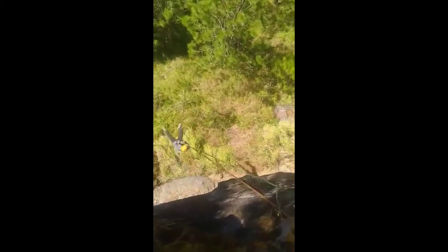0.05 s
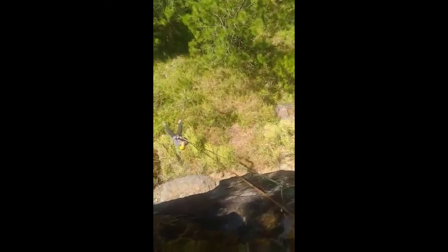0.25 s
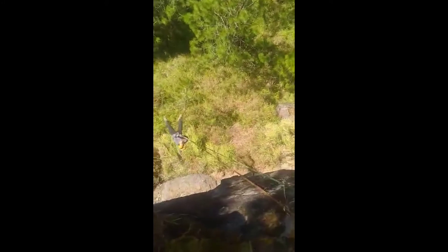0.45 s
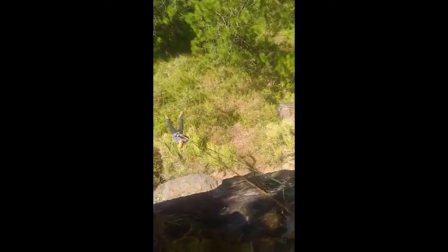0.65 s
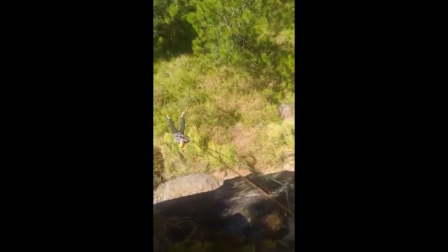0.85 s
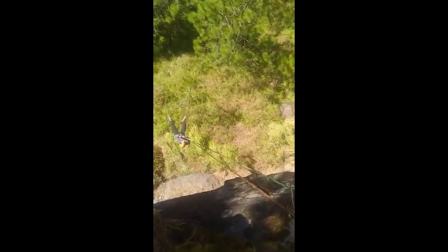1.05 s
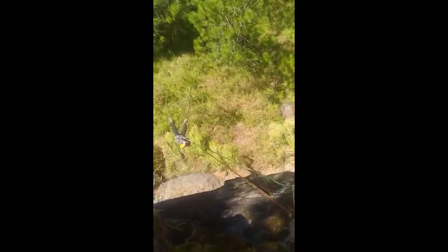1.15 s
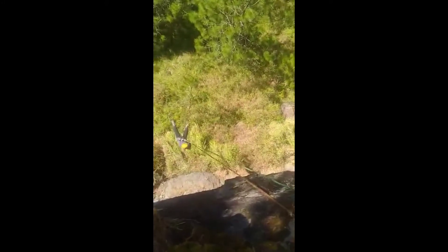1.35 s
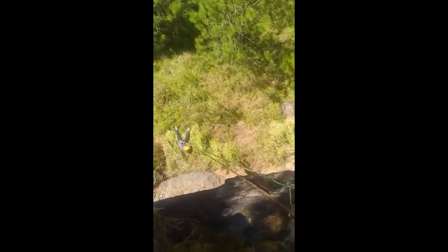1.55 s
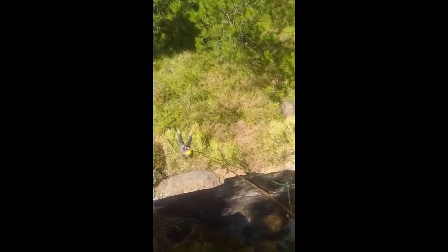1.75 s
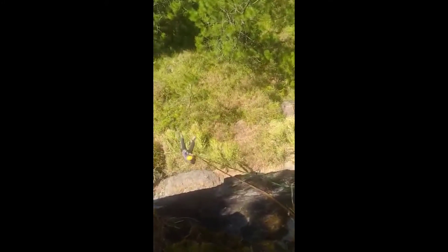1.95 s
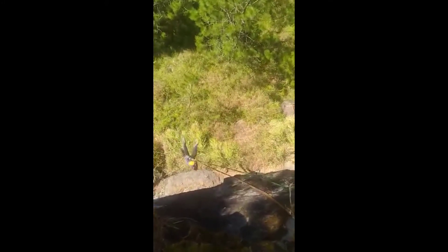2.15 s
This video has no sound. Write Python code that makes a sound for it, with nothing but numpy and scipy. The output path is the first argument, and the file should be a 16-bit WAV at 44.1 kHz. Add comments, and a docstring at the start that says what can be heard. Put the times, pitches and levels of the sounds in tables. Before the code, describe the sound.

Wind buffets a small microphone on an open ledge, with low rumble, irregular thumps and a faint hiss over softly rustling trees and grass. The strongest gust hits around 0.5 seconds as the hiss sinks, then eases by 0.8 seconds. Hiss and faint hollow hoots return after 1.1 seconds, peak near 1.7 and die away, leaving weaker buffeting until just past 2 seconds.

```python
"""Gusty wind on an open cliff ledge, blowing across a small microphone.
From the start, turbulence rumbles on the diaphragm, eddies thump it and air skimming the housing
hisses and makes its cavities hoot faintly, over a soft wash of trees and grass. Near 0.5 s the
strongest gust tears into finer turbulence and the hiss sinks. Hiss and hoots return after 1.1 s,
peak near 1.7 s and die away, leaving weaker buffeting and the wash."""
import sys
import numpy as np
from scipy import signal
from scipy.fft import rfft, irfft
from scipy.io import wavfile

SR = 44100
rng = np.random.default_rng(int(sys.argv[2]) if len(sys.argv) > 2 else 0)


def store_pcm(level_fs):
    """Save levels as 16-bit WAV."""
    pcm = np.round(np.clip(level_fs, -1, 1) * 32767).astype(np.int16)
    wavfile.write(sys.argv[1], SR, np.atleast_2d(pcm).T)


N = 97020
T, HZ = np.arange(N) / SR, np.fft.rfftfreq(N, 1 / SR)


def amp(db):
    """Amplitude ratio of a level: tenfold for every 20 dB."""
    return 10 ** (np.asarray(db) / 20)


def unit(x):
    """Normalisation to an rms of one."""
    return x / np.sqrt(np.mean(x ** 2) + 1e-30)


def curve(points):
    """Linear interpolation of (t/s, value) points at every sample."""
    return np.interp(T, *np.transpose(points))


def noise(gain):
    """Spectral shaping: white noise weighted by a gain at each frequency, at unit rms."""
    return unit(irfft(rfft(rng.standard_normal(N)) * gain, N))


def coloured(points):
    """Noise whose spectral density follows (f/Hz, relative level/dB) points."""
    hz, db = np.transpose(points)
    return noise(amp(np.interp(np.log(HZ + 1), np.log(hz), db)))


def flicker(depth_db, rate_hz):
    """Random amplitude modulation: a log-normal gain, wavering mostly below the given rate."""
    waver = noise((HZ > 2) / (1 + (HZ / rate_hz) ** 2))
    return unit(amp(depth_db * waver))


def steadied(x, strength=.85, smoothing_s=.018):
    """Envelope compression: evens out chance swells, so a noise keeps to the force of the wind."""
    window = np.hanning(int(2 * smoothing_s * SR))
    power = signal.fftconvolve(abs(signal.hilbert(x)) ** 2, window / window.sum(), "same")
    return unit(x / (abs(power) + 1e-6) ** (strength / 2))


def swell(at, length, db):
    """A Gaussian envelope: a bell-shaped rise and fall."""
    return amp(db) * np.exp(-2 * ((T - at) / length) ** 2)


def resonance(hz, half_width):
    """Resonance: noise confined to a narrow peak about a natural frequency."""
    return noise(1 / (1 + ((HZ - hz) / half_width) ** 2))


def turbulent_rumble():
    """Turbulent pressure fluctuations drive the diaphragm at low frequencies."""
    # spectrum of the pressure: f/Hz, relative level/dB
    spectrum = [(20, -6), (38, -22), (50, -12.5), (65, -10), (90, -3.5), (125, 2.5), (170, -6.5),
                (235, -10), (300, -21), (450, -31.5), (800, -51), (2000, -71.5)]
    # strength of the turbulence: t/s, level/dB
    gusts = [(0, -58.5), (.07, -70), (.14, -55), (.225, -65), (.25, -45), (.31, -50.5), (.425, -47),
             (.45, -40.5), (.5, -36.5), (.6, -34), (.635, -42.5), (.71, -40), (.74, -57), (.81, -57),
             (.9, -59.5), (.98, -57.5), (1.08, -59.5), (1.22, -56), (1.43, -66), (1.55, -55), (1.64, -59),
             (1.72, -51.5), (1.8, -55.5), (1.85, -55.5), (2.08, -58), (2.2, -63.5)]
    return steadied(coloured(spectrum)) * amp(curve(gusts)) * flicker(depth_db=3, rate_hz=40)


def skimming_air():
    """Flow noise: hiss, rush and cavity resonance each grow as a power of one flow's strength."""
    # flow over the housing: t/s, level/dB
    flow = [(0, -67.5), (.07, -68), (.088, -64), (.19, -61.5), (.235, -62.5), (.28, -60), (.335, -66),
            (.39, -64), (.5, -70), (.64, -80.5), (.9, -81.5), (.96, -77), (1.12, -75), (1.138, -69.5),
            (1.35, -68), (1.52, -70.5), (1.61, -67.5), (1.675, -60.5), (1.72, -67.5), (1.82, -61.5),
            (1.845, -72), (1.96, -78), (2.1, -85.5), (2.2, -89.5)]
    # fine hiss: f/Hz, relative level/dB
    hiss_spectrum = [(500, -30), (2500, -18), (4200, -18.5), (4700, -11.5), (5400, -6.5), (6100, -9),
                     (6650, -8.5), (7150, -1), (8400, 0.5), (9200, -2), (10000, -5), (13000, -6.5)]
    # broad rush: f/Hz, relative level/dB
    rush_spectrum = [(100, -6.5), (300, 7), (420, 8), (550, 6.5), (800, 2.5), (1100, -3), (1500, -6.5),
                     (2200, -4.5), (2600, 1.5), (3000, -1), (3400, -6), (3900, -15.5), (4300, -24),
                     (7000, -22.5)]
    # cavities of the housing: f/Hz, half-width/Hz, level/dB at the reference flow
    cavities = [(397, 84, -67.5), (671.4, 68, -66), (917, 106, -70.5), (1215, 77, -76.5)]
    reference_db, rush_slope, ring_slope = -68, 0.62, 0.82  # slopes in dB per dB of flow
    flow_db = curve(flow)
    excess_db = flow_db - reference_db
    hiss = coloured(hiss_spectrum) * amp(flow_db - 0.5) * flicker(depth_db=1, rate_hz=240)
    rush = coloured(rush_spectrum) * amp(-65 + rush_slope * excess_db)
    rush *= flicker(depth_db=0.5, rate_hz=37)
    ring = sum(amp(db) * resonance(hz, half_width) * flicker(depth_db=2.5, rate_hz=11)
               for hz, half_width, db in cavities)
    return hiss + rush + ring * amp(ring_slope * excess_db)


def foliage():
    """Incoherent addition: wind in distant trees and grass merges into a smooth wash."""
    # spectrum of the wash: f/Hz, relative level/dB
    spectrum = [(30, -24.5), (100, 14), (300, 6), (500, 1.5), (900, -6.5), (1400, -6), (2000, -7.5),
                (2800, -15.5), (3400, -23.5), (4200, -20), (8000, -26), (13000, -31.5)]
    # its slow drift: t/s, level/dB
    drift = [(0, -63), (.4, -64.5), (.75, -65.5), (1.02, -62), (1.5, -64.5), (1.9, -64), (2.2, -65)]
    return coloured(spectrum) * amp(curve(drift))


def eddy_thumps(spread_octaves=0.42):
    """Each eddy striking the microphone is a pressure transient, a short burst of low noise."""
    # eddies: t/s, duration/s, level/dB, centre f/Hz
    eddies = [(0.022, 0.011, -55.5, 220), (.247, 0.015, -34.5, 153), (0.268, 0.017, -39.5, 121),
              (0.329, 0.017, -36.5, 114), (0.451, 0.017, -39.5, 165), (0.56, 0.022, -36, 172),
              (0.611, 0.019, -29, 106), (0.662, 0.037, -36, 115), (0.767, 0.015, -37, 117.4),
              (0.937, 0.016, -46.5, 133), (0.988, 0.027, -44, 123), (1.042, 0.009, -48, 125),
              (1.209, 0.023, -43, 148), (1.49, 0.0091, -51.5, 122), (1.58, 0.021, -56.5, 143),
              (1.702, 0.013, -42.5, 128), (1.807, 0.034, -45, 106), (1.875, 0.011, -43.5, 104),
              (1.91, 0.031, -45.5, 109.5), (1.968, 0.025, -49, 110), (2.038, 0.023, -47.5, 87),
              (2.109, 0.025, -47.5, 102), (2.187, 0.0083, -56.5, 230)]
    thumps = np.zeros(N)
    for at, length, db, hz in eddies:
        band = np.exp(-.5 * (np.log2((HZ + 1) / hz) / spread_octaves) ** 2)
        thumps += swell(at, length, db) * steadied(noise(band))
    return thumps


def cavity_hoots():
    """Flow-excited resonance: a brief airy tone sounds where the flow catches a cavity."""
    # hoots: t/s, duration/s, level/dB, f/Hz
    hoots = [(0.104, 0.029, -54.5, 710), (0.155, 0.014, -51.5, 700), (.19, 0.041, -58, 430),
             (0.263, 0.028, -53, 472), (0.325, 0.024, -57.5, 647), (0.445, 0.0095, -54.5, 668),
             (1.145, 0.03, -59.5, 690), (1.208, 0.014, -57, 680), (1.309, 0.01, -57.5, 673),
             (1.666, 0.021, -48, 391), (1.732, 0.011, -53.5, 696)]
    return sum(swell(at, length, db) * steadied(resonance(hz, half_width=42))
               for at, length, db, hz in hoots)


def tearing_gust():
    """Energy cascade: the strongest gust breaks into finer turbulence of higher frequency."""
    # spectrum of the finer turbulence: f/Hz, relative level/dB
    spectrum = [(60, -39), (150, 2.5), (230, 1.5), (340, -10.5), (450, -15), (600, -26.5), (1000, -40),
                (3000, -63)]
    # its bursts: t/s, duration/s, level/dB
    bursts = [(0.489, 0.053, -41.5), (0.543, 0.034, -40.5), (0.72, 0.036, -53.5)]
    return steadied(coloured(spectrum)) * sum(swell(*burst) for burst in bursts)


def scene():
    """Superposition: the pressures of all sources add at one microphone."""
    buffeting = turbulent_rumble() + eddy_thumps() + tearing_gust()
    return (buffeting + skimming_air() + cavity_hoots() + foliage())[None]


def record(dry):
    """Band limiting: the microphone's fourth-order bass roll-off, then the recorder's low-pass."""
    low_cut_hz, high_cut_hz = 69.7, 13055
    hz = np.fft.rfftfreq(2 * N, 1 / SR)
    bass_attenuation = np.sqrt(1 + (low_cut_hz / (hz + 1)) ** 8)
    thinned = irfft(rfft(dry, 2 * N) / bass_attenuation)[:, :N]
    low_pass = signal.firwin(1023, high_cut_hz, window=("kaiser", 8), fs=SR)
    return signal.oaconvolve(thinned, low_pass[None], "same")


dry = scene()
out = record(dry)
store_pcm(out)
```